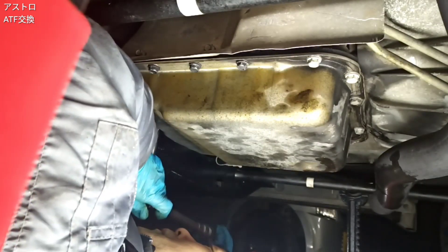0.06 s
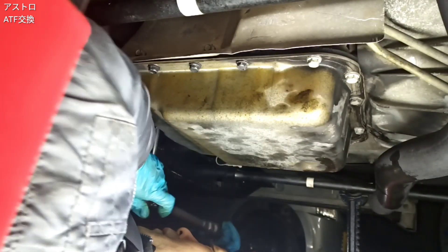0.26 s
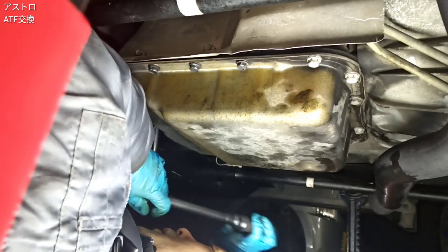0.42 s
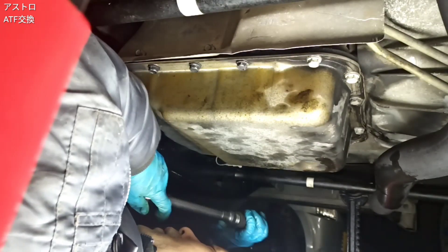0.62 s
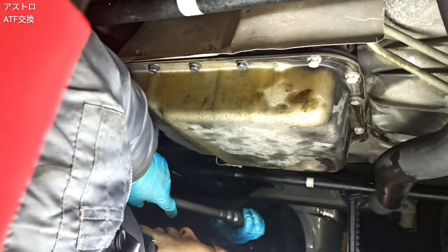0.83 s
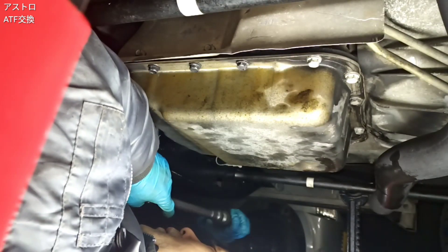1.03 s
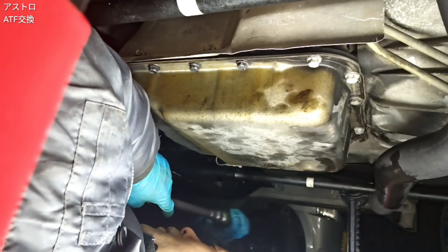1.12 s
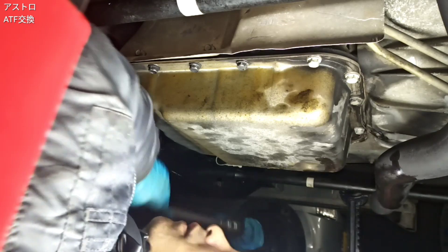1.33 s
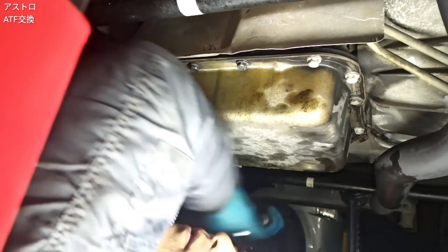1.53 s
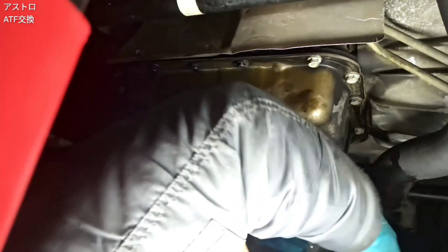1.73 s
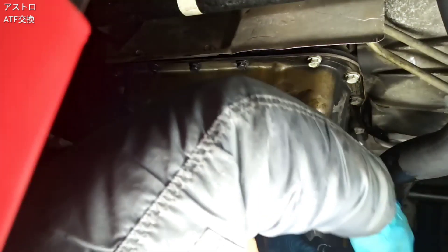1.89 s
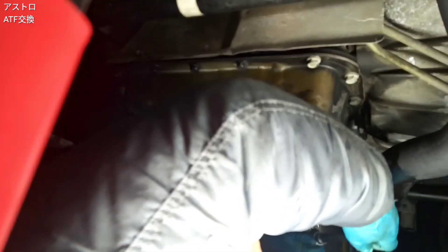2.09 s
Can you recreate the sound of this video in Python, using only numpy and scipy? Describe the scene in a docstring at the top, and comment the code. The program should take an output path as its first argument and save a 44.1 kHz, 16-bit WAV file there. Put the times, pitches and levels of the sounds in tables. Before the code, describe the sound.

Sharp steel clicks of a torque wrench, a quiet pause, then clattering metal under a car

```python
"""Torque wrench under a car

A click-type torque wrench works on bolts under a car in a quiet garage, heard from close by.
Impacts excite decaying modes: steel clicks ring the wrench, duller knocks ring the hollow pan.
Dense grit makes the socket scrape as it is moved on, a swept sine makes it sing, and cloth rustles.
Decaying noise gives the cramped space a short tail; shaped noise and two sines form a faint room tone."""
import sys
import numpy as np
from scipy import signal
from scipy.fft import rfft, irfft
from scipy.io import wavfile
from scipy.ndimage import uniform_filter1d

SR = 44100
rng = np.random.default_rng(int(sys.argv[2]) if len(sys.argv) > 2 else 0)


def decibels_to_gain(level_db):
    """Convert a level in decibels to a linear amplitude gain (20 dB per decade)."""
    exponent = np.asarray(level_db, float) / 20
    return 10 ** exponent


def wrap_up_sound(samples):
    """Save the sound to the file named by the first command line argument, as 16-bit audio."""
    columns = np.atleast_2d(samples).T
    # keep every value between -1 and 1, then stretch to whole-number steps
    tamed = np.clip(columns, -1, 1)
    steps = np.round(tamed * 32767).astype(np.int16)
    wavfile.write(sys.argv[1], SR, steps)


N = 94815  # length [samples]

# Contacts of steel on steel, levels ahead of the tail and microphone:
# (time [s], short-term peak level [dB], contact centre [Hz], offset to -6 dB [octaves], chatter t60 [s])
STEEL_CLICKS = [(.2285, -9.5, 3460, 0.56, 0.028), (.2295, -20, 2950, 0.55, 0.11),
                (.2879, -27.5, 1700, 0.2, 0.063), (.2882, -26.5, 4500, 0.59, 0.034),
                (.4798, -16.5, 5450, 0.34, 0.039), (.481, -38.5, 2550, 0.84, 0.049),
                (.6105, -32.5, 5500, 0.74, 0.041), (.625, -31, 2500, 0.9, 0.034),
                (.672, -31.5, 5200, 0.65, 0.032), (1.218, -36, 4360, 0.25, 0.05),
                (1.224, -31.5, 1760, 0.29, 0.051), (1.332, -50.5, 1820, 0.39, 0.036),
                (1.4775, -31.5, 2560, 0.13, 0.023), (1.5008, -16.5, 3600, 0.63, 0.039),
                (1.511, -26.5, 1900, 0.53, 0.086), (1.514, -26, 3740, 0.15, 0.079),
                (1.52, -33, 6630, 0.24, 0.044), (1.6035, -24, 3250, 2.2, 0.046),
                (1.657, -38.5, 3140, 1.1, 0.046), (1.687, -35, 2400, 1.4, 0.2),
                (1.699, -30, 3280, 1.4, 0.051), (1.7168, -18.5, 2800, 0.9, 0.028),
                (1.753, -17, 4600, 0.59, 0.09), (1.766, -19, 2000, 0.34, 0.017),
                (1.779, -22, 3570, 0.47, 0.013), (1.795, -26.5, 4260, 0.097, 0.084),
                (1.8025, -24, 2700, 0.37, 0.028), (1.814, -25.5, 1520, 1.14, 0.037),
                (2.1, -33.5, 2560, 0.73, 0.05), (2.109, -41.5, 1270, 0.066, 0.024),
                (2.129, -42, 2730, 1.2, 0.081)]
# Knocks on the pan, same columns:
# (time [s], short-term peak level [dB], contact centre [Hz], offset to -6 dB [octaves], chatter t60 [s])
PAN_KNOCKS = [(.126, -35.5, 590, 0.92, 0.018), (.137, -43, 310, 1.17, 0.095),
              (.177, -41.5, 500, 1.9, 0.032), (.186, -39, 330, 1.24, 0.028), (.295, -48, 400, 0.44, 0.073),
              (.424, -44.5, 370, 0.61, 0.025), (.624, -31.5, 723, 0.66, 0.056),
              (.633, -29, 708, 0.09, 0.04), (.633, -50.5, 89, 0.75, 0.043), (.671, -46, 680, 0.19, 0.053),
              (1.224, -38.5, 288, 0.79, 0.099), (1.226, -44, 700, 0.057, 0.06),
              (1.332, -44.5, 266, 0.44, 0.13), (1.337, -47.5, 700, 0.057, 0.04),
              (1.477, -29.5, 706, 0.73, 0.067), (1.487, -30, 681, 0.061, 0.048),
              (1.604, -23, 855, 0.41, 0.026), (1.638, -31.5, 840, 1.03, 0.051), (1.659, -39, 800, 1, 0.15),
              (1.686, -30.5, 805, 0.51, 0.078), (1.698, -28, 640, 0.34, 0.083),
              (1.713, -24.5, 880, 0.29, 0.11), (1.743, -29.5, 700, 0.21, 0.028),
              (1.756, -24, 640, 0.37, 0.22), (1.775, -27, 538, 0.19, 0.19), (1.802, -26, 640, 0.5, 0.049),
              (1.812, -54, 780, 0.86, 0.091), (1.824, -42, 281, 0.1, 0.045), (1.895, -32, 633, 0.24, 0.055),
              (1.908, -45, 635, 1.07, 0.2), (2.028, -52, 600, 3.1, 0.085)]
# Modes of the wrench: (frequency [Hz], relative level [dB], t60 before the grip limit [s])
WRENCH_MODES = [(1270, -16, 0.18), (1451, -0.5, 0.036), (1676, -5.5, 0.039), (1882, -6.5, 0.06),
                (2000, 4, 0.012), (2354, -6, 0.013), (2560, -10, 0.066), (2857, -8, 0.038),
                (3250, -3.5, 0.024), (3566, -24, 0.049), (3791, -0.5, 0.023), (4075, -13.5, 0.059),
                (4437, -1, 0.023), (5450, -2, 0.012), (5875, 0, 0.013), (6730, -6.5, 0.03)]
# Modes of the hollow pan: (frequency [Hz], relative level [dB], t60 before the grip limit [s])
PAN_MODES = [(120, 8, 0.12), (200, 2.5, 0.059), (281, -6.5, 0.16), (418.4, 4, 0.053), (522.5, 3, 0.065),
             (640, -8, 0.14), (700, 1.5, 0.036), (880, -9.5, 0.074), (1025, -23.5, 0.065),
             (1255, 2.5, 0.098)]
# Strokes of the scraping socket, one list each: (time [s], level [dB])
SCRAPE_STROKES = [
    [(1.725, -45), (1.745, -33.5), (1.76, -28.5), (1.775, -36), (1.8, -36), (1.825, -42), (1.85, -88)],
    [(1.896, -50), (1.92, -52), (1.955, -54), (1.965, -66), (2.0, -72)],
]
# Singing of the socket: (time [s], pitch [Hz], level before roughening [dB])
SOCKET_SQUEAL = [(1.733, 1693, -61), (1.769, 2004, -52), (1.786, 2000, -36)]
# Brushing of the sleeve: (time [s], level [dB])
SLEEVE_BRUSH = [(0.04, -100), (0.066, -54), (0.098, -65), (0.152, -45), (0.198, -80)]
# Spectrum of the room noise: (frequency [Hz], relative level [dB])
ROOM_SPECTRUM = [(25, -19), (60, -9.5), (120, -0.5), (250, -4.5), (500, -2.5), (1000, -8), (2000, -9),
                 (4000, -11.5), (8000, -13.5), (16000, -6.5)]
# Steady tones in the room: (frequency [Hz], level [dB])
STEADY_TONES = [(1000, -80), (5020, -81)]
# Response of the microphone: (frequency [Hz], gain [dB])
MIC_RESPONSE = [(20, 13.5), (6000, -3.5), (7200, -8), (8200, -17.5), (10000, -18.5), (13000, -21),
                (14500, -16.5), (15700, -13), (16100, -48)]


def colour(x, points):
    """Linear filtering: a zero-phase gain through (Hz, dB) points, straight on a log-frequency axis."""
    hz, db = np.array(points, float).T
    f = np.maximum(np.arange(len(x) // 2 + 1) * SR / len(x), 1)
    gain_db = np.interp(np.log(f), np.log(hz), db)
    return irfft(rfft(x) * decibels_to_gain(gain_db), len(x))


def unit(x):
    """Normalisation: equal power, here an rms of 1."""
    return x / np.sqrt(np.mean(x ** 2) + 1e-30)


def grit(size, spread_db):
    """Rough contact: a train of tiny impacts of very uneven size."""
    return rng.standard_normal(size) * decibels_to_gain(spread_db * rng.standard_normal(size))


def curve(rows):
    """Amplitude envelope: gain along (s, dB) rows, practically silent outside."""
    s, db = np.array(rows, float).T
    return decibels_to_gain(np.interp(np.arange(N) / SR, s, db, left=-120, right=-120))


def ring(push, modes, weight_db):
    """Modal superposition: each driven mode is a close trio of resonators, damped by the grip."""
    split = 0.012  # relative pitch scatter, shrinking below 2500 Hz
    grip_cycles = 170  # longest t60, in cycles of the mode
    out = 0
    for (hz, db, t60), weight in zip(modes, weight_db):
        decay_s = min(t60, grip_cycles / hz)
        r = np.exp(-np.log(1000) / (decay_s * SR))  # pole radius
        trio = 0
        for shift in split * rng.standard_normal(3) * min(hz / 2500, 1):
            angle = 2 * np.pi * hz * (1 + shift) / SR
            trio = trio + signal.lfilter([1, 0, -1], [1, -2 * r * np.cos(angle), r * r], push)
        out = out + decibels_to_gain(db + weight) * unit(trio) / np.sqrt(1 - r * r)
    return out


def blows(rows, modes, rise_s, top_db):
    """Impact excitation: a short chatter rings the modes near its contact pitch, with a noisy crack."""
    chatter_spread_db, mode_scatter_db, crack_db = 3, 2, -7
    top_db_per_octave = 23.5  # brighter contacts hiss higher
    softer_per_db = 0.4447  # weaker contacts start softer; rise_s holds at -7.5 dB
    out = np.zeros(N + 8192)
    t = np.arange(8192) / SR
    grid = 20 * 2 ** np.arange(0, 10.1, .1)  # Hz
    mode_hz = np.array(modes)[:, 0]
    for s, db, hz, wide, t60 in rows:
        def bell(f):
            return -6 * (np.log2(f / hz) / max(wide, .1)) ** 2

        rise = rise_s * decibels_to_gain(-softer_per_db * (db + 7.5))
        onset = 1 - np.exp(-(t / rise) ** 2)
        push = grit(len(t), chatter_spread_db) * onset * decibels_to_gain(-60 * t / t60)
        scatter = mode_scatter_db * rng.standard_normal(len(modes))
        body = ring(push, modes, bell(mode_hz) + scatter)
        # floor of the crack spectrum, raised above the contact pitch
        skirt = np.where(grid < hz, -70, top_db + top_db_per_octave * np.log2(hz / mode_hz[-1]))
        crack = colour(push, np.c_[grid, np.maximum(bell(grid), skirt)]) * (t < .15)
        fade = np.minimum((t[-1] - t) / .03, 1)
        blow = (unit(body) + decibels_to_gain(crack_db) * unit(crack)) * fade
        # peak taken as twice the greatest rms over 3 ms
        peak = 2 * np.sqrt(uniform_filter1d(blow ** 2, size=130).max())
        start = int(s * SR)
        out[start:start + len(t)] += decibels_to_gain(db) * blow / peak
    return out[:N]


def clicks():
    """Hard impact: brief steel contacts excite the high modes of the wrench and a bright crack."""
    return blows(STEEL_CLICKS, WRENCH_MODES, rise_s=0.00071, top_db=12)


def knocks():
    """Dull impact: lower-pitched contacts excite the low modes of the hollow pan, with little hiss."""
    return blows(PAN_KNOCKS, PAN_MODES, rise_s=0.00077, top_db=-42)


def scrape():
    """Sliding friction: dense grit under the socket rings the wrench and hisses."""
    gain = sum(curve(rows) for rows in SCRAPE_STROKES)
    push = gain * grit(N, 0.5)
    hiss = colour(push, [(200, -75), (1200, 35), (6000, 23), (16000, -32)])
    steel = ring(push, WRENCH_MODES, [0] * len(WRENCH_MODES))
    hiss_db = -4.5  # relative to the ringing steel
    mix = unit(steel) + decibels_to_gain(hiss_db) * unit(hiss)
    return np.sqrt(np.mean(gain ** 2)) * unit(mix)


def squeal():
    """Frictional singing: the sliding socket holds one rough tone that rises, then stays near its top."""
    s, hz, db = np.array(SOCKET_SQUEAL, float).T
    pitch = np.interp(np.arange(N) / SR, s, hz)
    rough = 1 + 0.4 * unit(uniform_filter1d(rng.standard_normal(N), size=150))
    sine = np.sqrt(2) * np.sin(2 * np.pi * np.cumsum(pitch) / SR)
    return curve(np.c_[s, db]) * rough * sine


def sleeve():
    """Fibre friction: a brushing sleeve rustles as uneven noise, strongest in the upper middle."""
    rustle = colour(grit(N, 3.0), [(300, 5.0), (2000, -3), (4500, 6), (6500, 7.5), (16000, 2.5)])
    return curve(SLEEVE_BRUSH) * unit(rustle)


def space(x):
    """Reverberation: convolution with decaying noise adds the short dense tail from under the car."""
    tail_db, tail_t60_s, onset_s = -23, 0.2, 0.0013  # level is tail energy relative to the direct sound
    t = np.arange(SR // 2) / SR
    decay = decibels_to_gain(tail_db) * unit(decibels_to_gain(-60 * t / tail_t60_s))
    onset = np.minimum(t / onset_s, 1)
    tail = rng.standard_normal(len(t)) * decay * onset / np.sqrt(len(t))
    return x + signal.fftconvolve(x, tail)[:N]


def room_tone():
    """Stationary background: soft broad noise of constant level with two faint sines."""
    t = np.arange(N) / SR
    noise = unit(colour(rng.standard_normal(N), ROOM_SPECTRUM))
    tones = sum(decibels_to_gain(db) * np.sqrt(2) * np.sin(2 * np.pi * hz * t) for hz, db in STEADY_TONES)
    return decibels_to_gain(-59) * noise + tones


def scene():
    """Superposition: the near sources share the tail, and the room tone is added to them."""
    near = clicks() + knocks() + scrape() + squeal() + sleeve()
    return (space(near) + room_tone())[None]


def band_limit(x):
    """A steep low-pass at the top of the band."""
    return signal.sosfilt(signal.butter(12, 16660, fs=SR, output="sos"), x)


def record(dry):
    """Transduction: the frequency response of the microphone colours the mix."""
    mix = colour(dry[0], MIC_RESPONSE)[None]
    return band_limit(mix)


dry = scene()
out = record(dry)
wrap_up_sound(out)
```